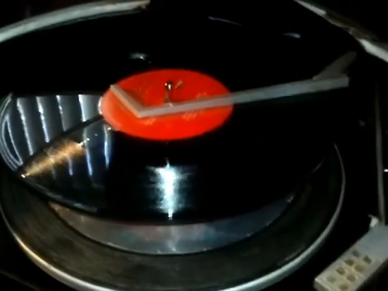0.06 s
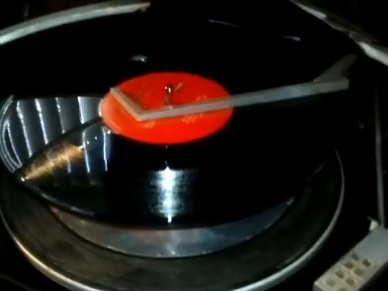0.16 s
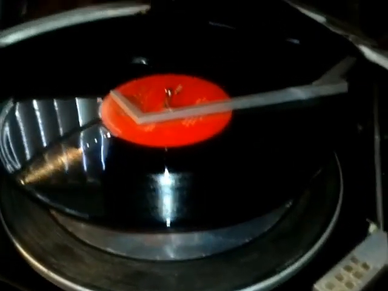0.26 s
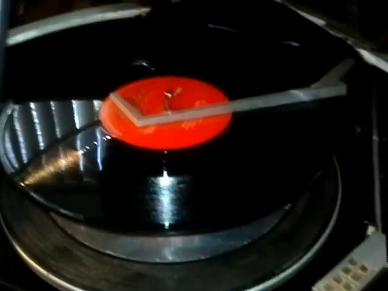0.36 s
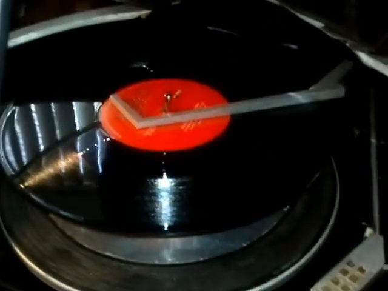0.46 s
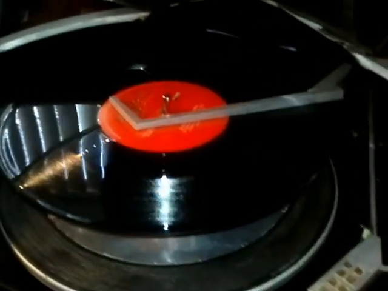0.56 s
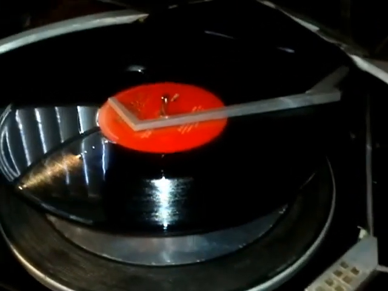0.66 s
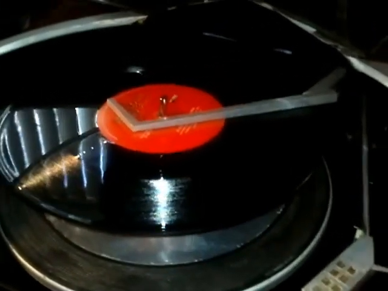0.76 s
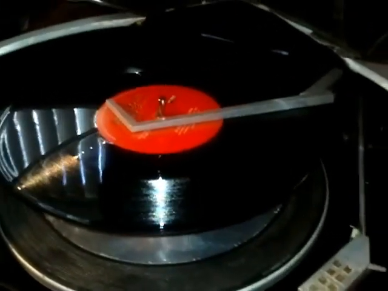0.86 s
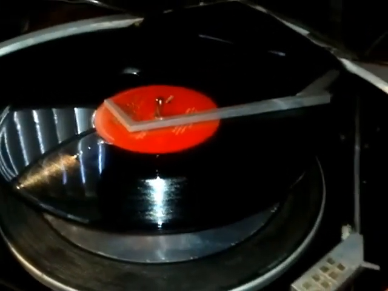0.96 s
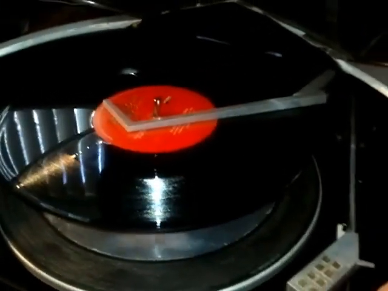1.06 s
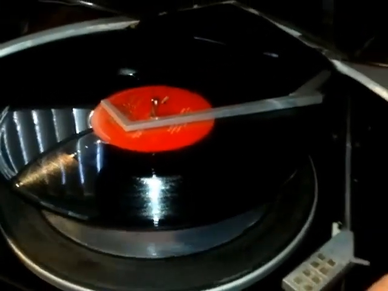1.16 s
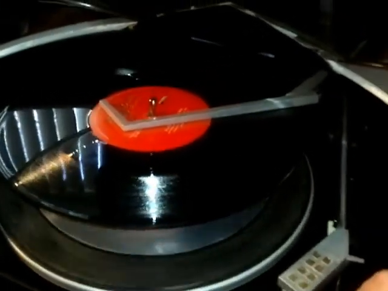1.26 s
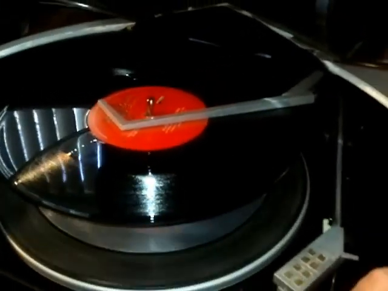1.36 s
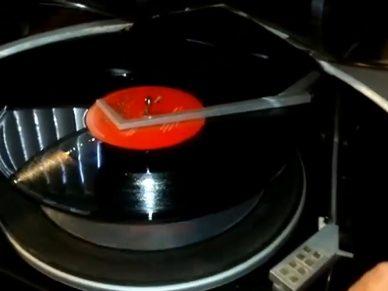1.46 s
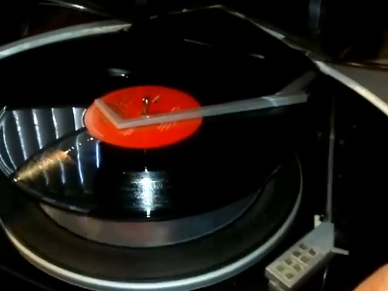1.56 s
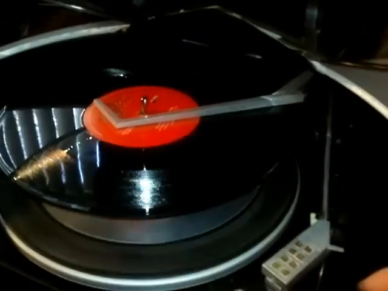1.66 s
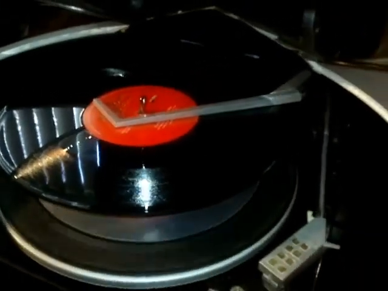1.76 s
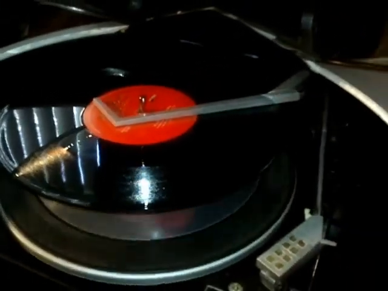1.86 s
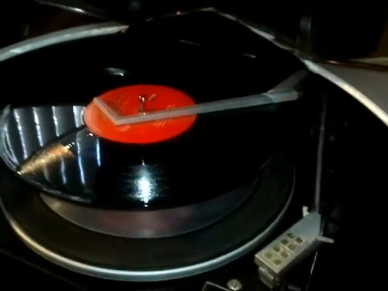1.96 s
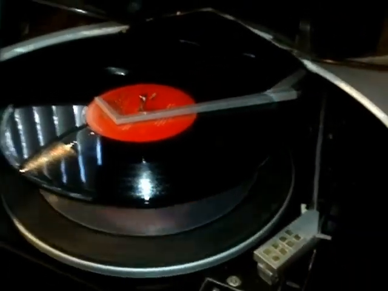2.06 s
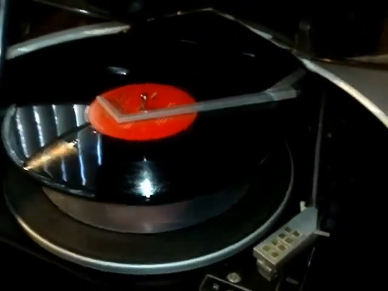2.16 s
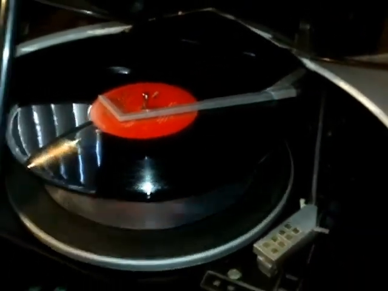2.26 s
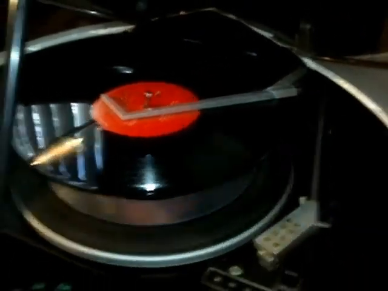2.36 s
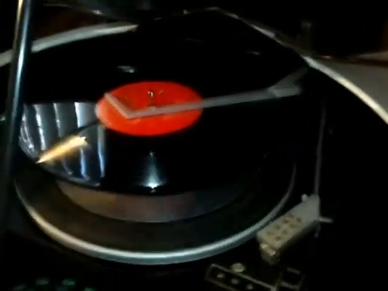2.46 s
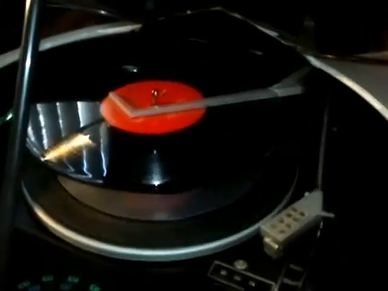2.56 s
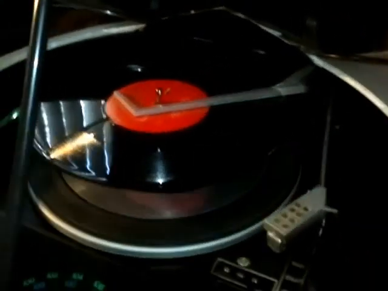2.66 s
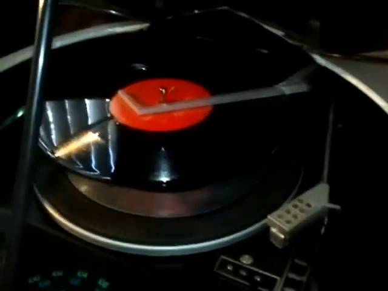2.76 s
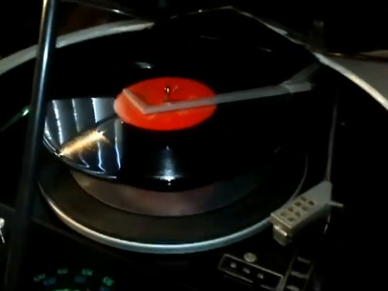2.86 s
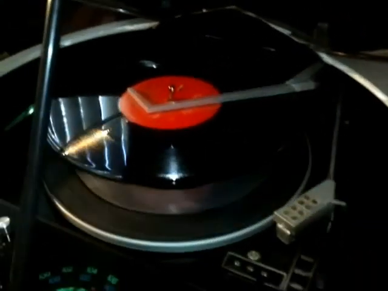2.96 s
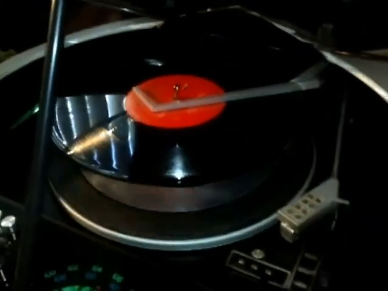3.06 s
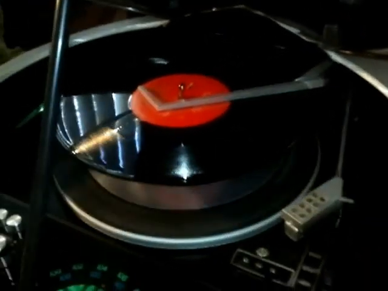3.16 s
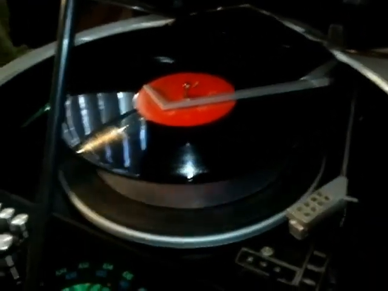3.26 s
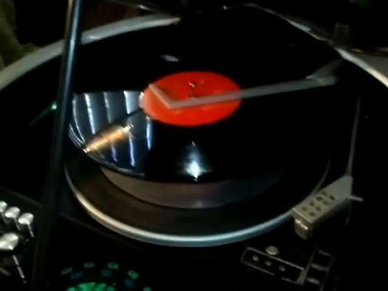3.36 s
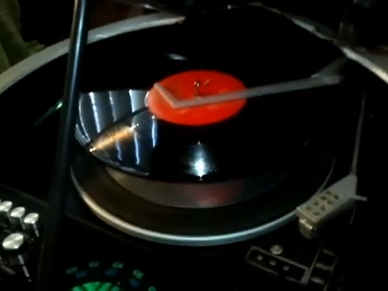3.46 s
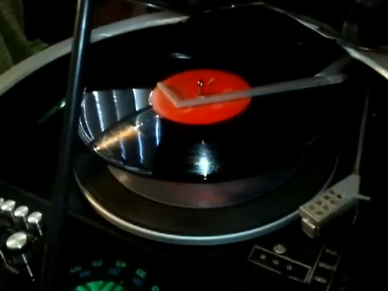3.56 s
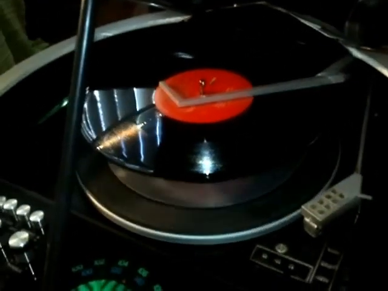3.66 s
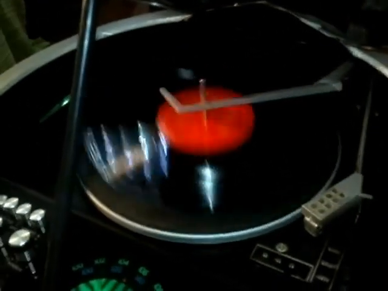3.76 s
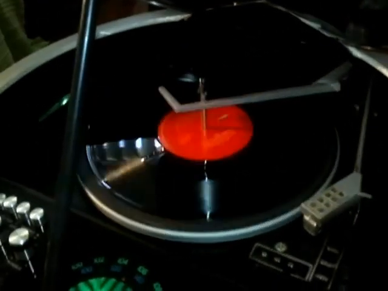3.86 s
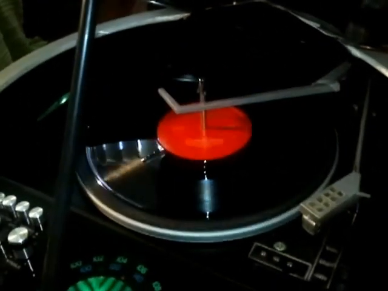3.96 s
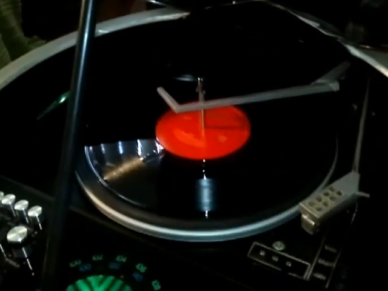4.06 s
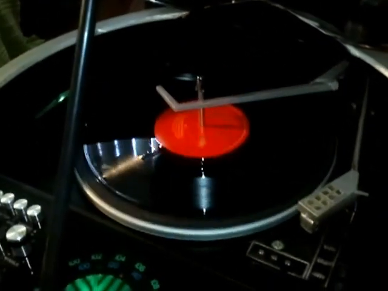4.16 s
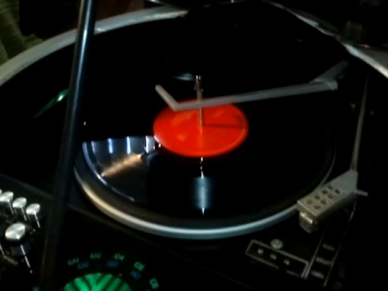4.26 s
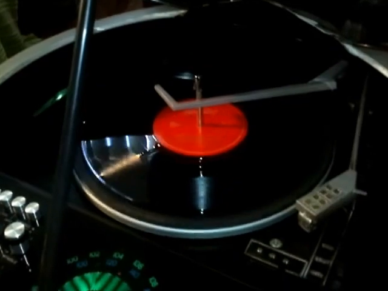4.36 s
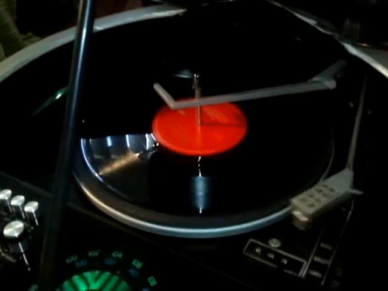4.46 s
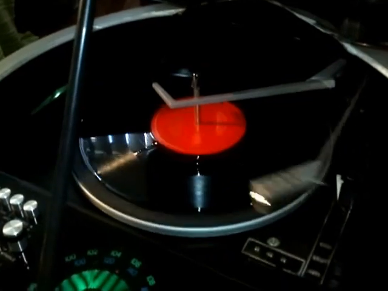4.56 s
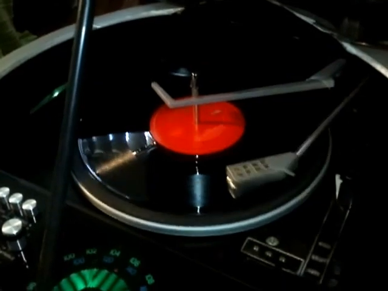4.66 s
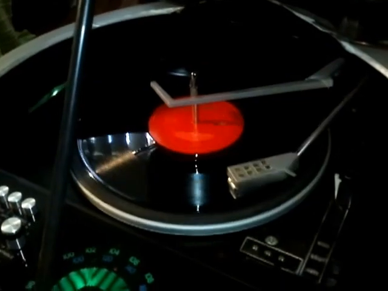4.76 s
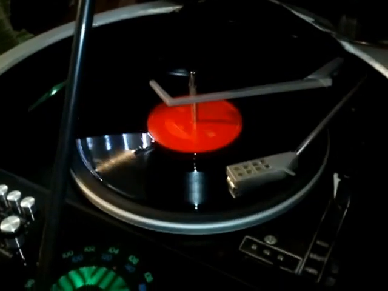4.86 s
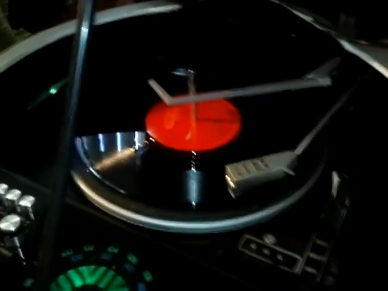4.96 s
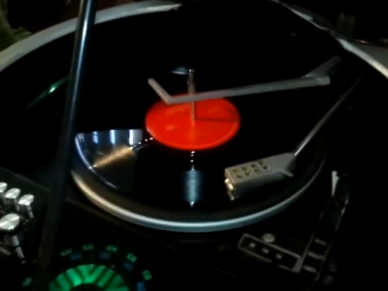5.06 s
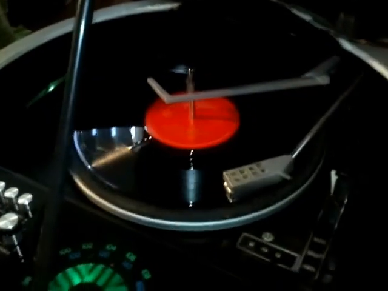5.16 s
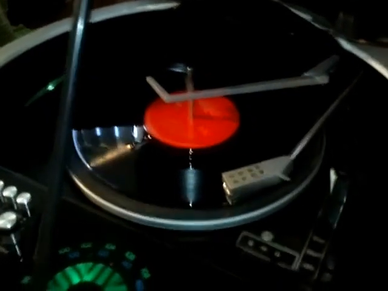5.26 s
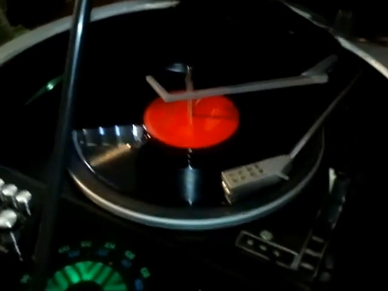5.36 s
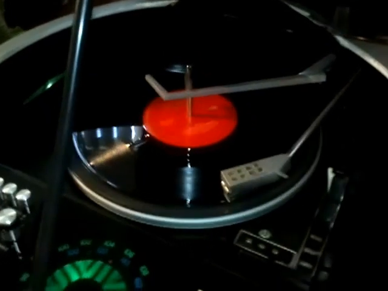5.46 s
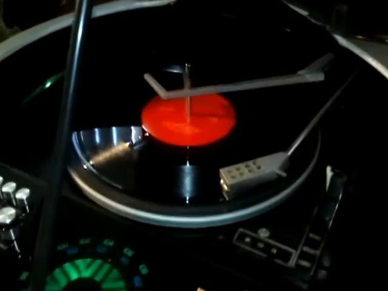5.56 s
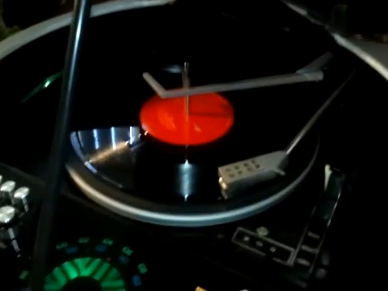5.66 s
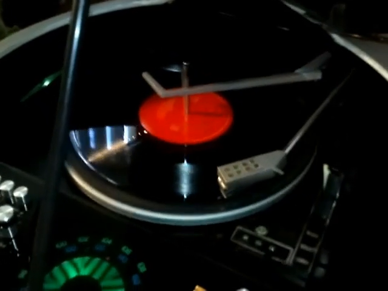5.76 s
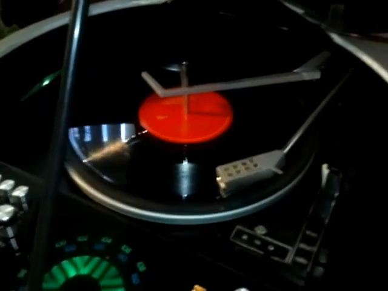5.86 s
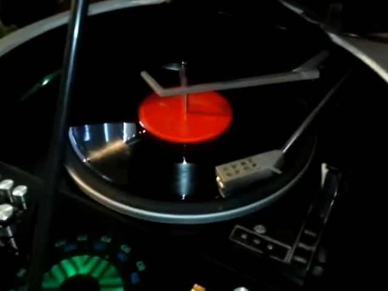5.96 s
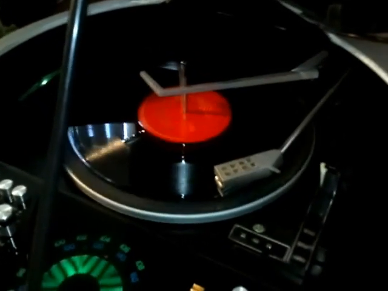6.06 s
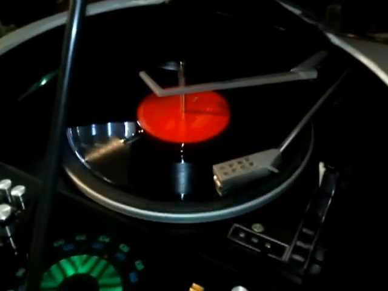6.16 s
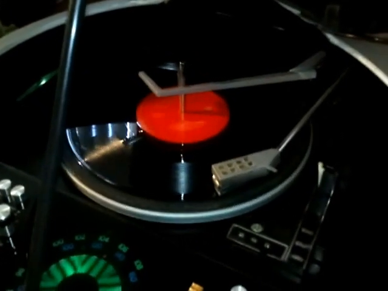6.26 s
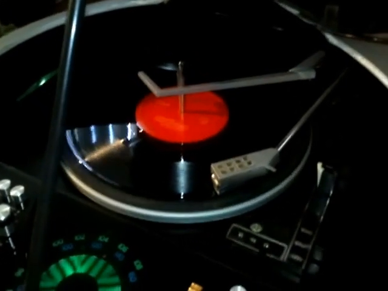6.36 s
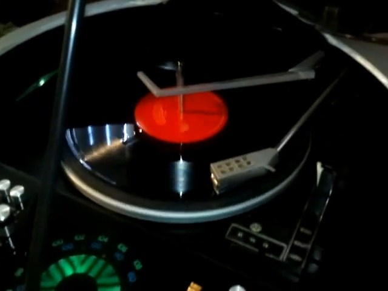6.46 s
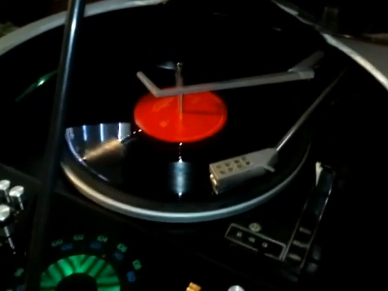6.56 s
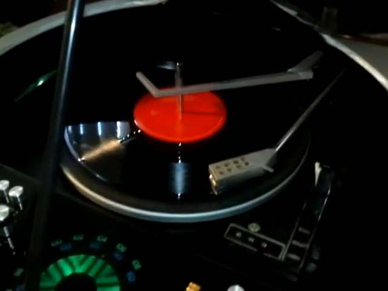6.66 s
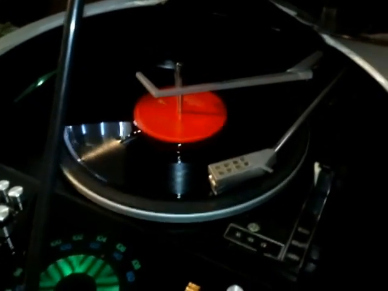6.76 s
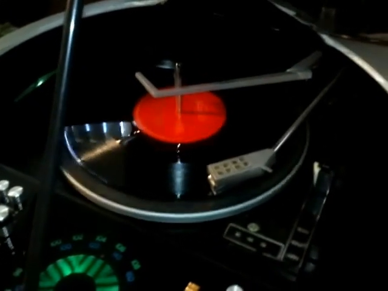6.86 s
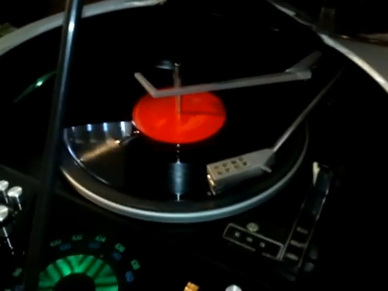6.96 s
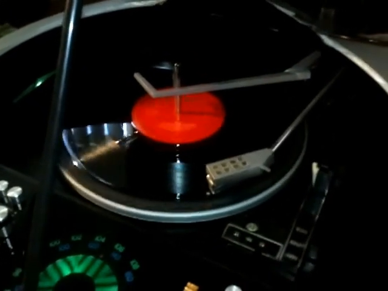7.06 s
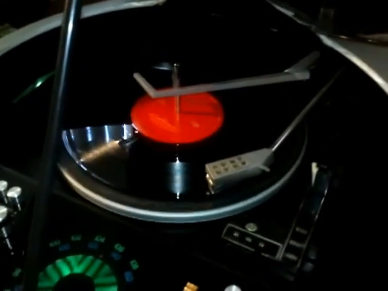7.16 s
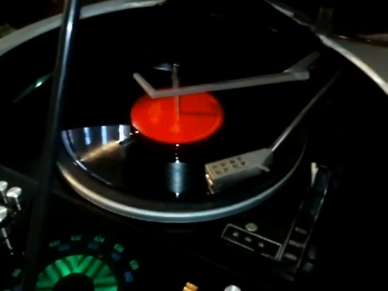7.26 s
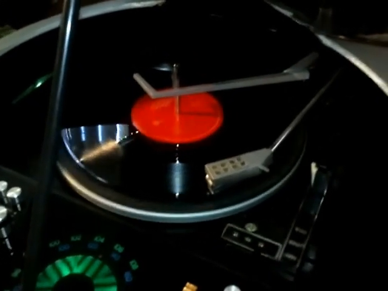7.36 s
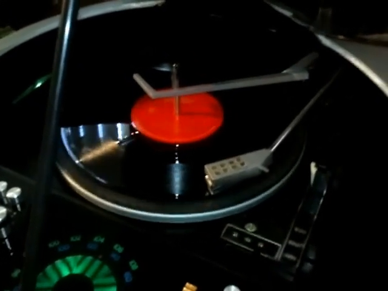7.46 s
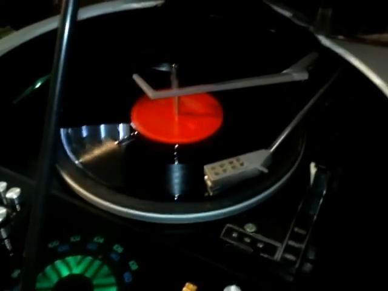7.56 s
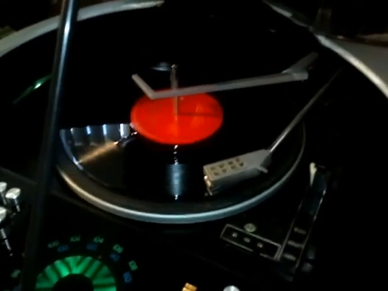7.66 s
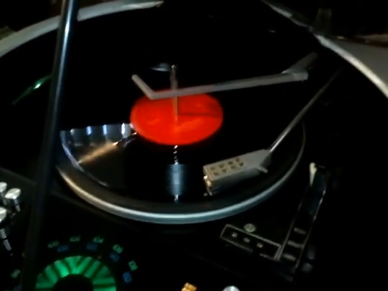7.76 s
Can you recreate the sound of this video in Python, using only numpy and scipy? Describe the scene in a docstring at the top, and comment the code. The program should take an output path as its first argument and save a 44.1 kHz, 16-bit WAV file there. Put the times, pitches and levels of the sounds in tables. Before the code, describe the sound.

A record changer, heard close in a small, short-echo room, over steady deep motor hum near 48 Hz and a bassy noise floor. Soft dull rubs come around 0.3-0.4 s, with a faint tick at 0.8. At 1.1 s the start lever snaps very loudly, followed by lesser clicks at 1.22-1.24 and a bright, hard clack against its stop at 1.53. From 2.05 s grainy midrange gear whirr rises, with cam knocks around 2.2 and brief drags at 2.9 and 3.2. At 3.8-3.9 the record drops in a tight flurry of slaps. Linkage clacks sharply at 4.27, lighter at 4.55-4.6, firmly again at 5.04. At 5.33-5.48 low loudspeaker thumps mark the landing; a scuffing skid follows at 5.64, another bump at 5.77, with thin sizzle. The whirr eases away, leaving hum and groove rumble, swelling gently after 6.9 until about 8.

```python
"""Record changer cycle

An automatic record changer runs through its cycle in a small room, over motor hum, gear noise and a steady floor.
Lever, stop, cam, record, linkage and pickup strike as filtered chatter plus damped modes; friction is shaped noise.
The stylus lands with low decaying tones from the loudspeaker, short skid tones and groove rumble."""
import sys
import numpy as np
from scipy import signal
from scipy.fft import rfft, irfft
from scipy.io import wavfile
from scipy.ndimage import uniform_filter1d

SR = 44100
rng = np.random.default_rng(int(sys.argv[2]) if len(sys.argv) > 2 else 0)


def wav_record(signal):
    """Record a signal, one row per channel, as 16-bit PCM in the file named by sys.argv[1]."""
    frames = np.transpose(np.atleast_2d(signal))
    bounded = np.clip(frames, -1, 1)
    # unit amplitude maps onto the largest positive 16-bit level
    quanta = np.round(bounded * 32767).astype(np.int16)
    wavfile.write(sys.argv[1], SR, quanta)


N = 343935
TIME = np.arange(N) / SR


def amp(db):
    """Decibels to gain."""
    return 10 ** (np.asarray(db) / 20)


def unit(x):
    """Scales to rms 1."""
    return x / np.sqrt(np.mean(x ** 2) + 1e-20)


def read(points, hz):
    """Reads a table on a log-frequency axis."""
    f, value = np.transpose(points)
    return np.interp(np.log(hz + 1), np.log(f + 1), value)


def add(mix, s, sound):
    """Mixes a sound in at time s."""
    part = mix[max(round(s * SR), 0):][:len(sound)]
    part += sound[:len(part)]


def noise(colour):
    """Steady noise of a given spectrum, rms 1."""
    gain = amp(read(colour, np.fft.rfftfreq(N, 1 / SR)))
    return unit(irfft(rfft(rng.standard_normal(N)) * gain, N))


def drift(knots_per_s):
    """Random wandering between 2000 knots, rms 1; holds its value after the last knot."""
    knots = rng.standard_normal(2000)
    return unit(np.interp(TIME * knots_per_s, np.arange(len(knots)), knots))


def since(start_s, settle_s):
    """Rises from 0 at start_s and settles exponentially at 1."""
    return 1 - np.exp(-np.maximum(TIME - start_s, 0) / settle_s)


def bumps(rows):
    """Sum of bell-shaped swells, from rows of middle_s, length_s and height."""
    return [(height, np.exp(-(2 * (TIME - s) / length) ** 2)) for s, length, height in rows]


def causal(gain_db):
    """Minimum-phase impulse response: the earliest energy this spectrum allows, normalised to 1."""
    log_gain = np.log(amp(np.r_[gain_db, gain_db[-2:0:-1]]))
    spectrum = np.exp(np.conj(signal.hilbert(log_gain)))
    click = np.fft.ifft(spectrum).real[:len(gain_db)]
    return click / np.linalg.norm(click)


def ring(modes, t):
    """Damped sines, each with a random starting phase."""
    out = 0
    for hz, db, t60 in modes:
        phase_turns = rng.random()
        out = out + amp(db - 60 * t / t60) * np.sin(2 * np.pi * (hz * t + phase_turns))
    return out


# room decay: band_hz, t60_s
ROOM_DECAY = [(150, 0.3), (600, 0.3), (2000, 0.2), (6000, 0.23), (15000, 0.24)]


def room(x, onset_s=0.0055):
    """A small room: dense reflections build up, then each band dies at its own speed."""
    hz, t, z = signal.stft(rng.standard_normal(SR // 2), SR, nperseg=256)
    decay = amp(-60 * t / read(ROOM_DECAY, hz)[:, None])
    tail = signal.istft(z * decay, SR, nperseg=256)[1]
    tail *= 1 - np.exp(-(np.arange(len(tail)) / SR / onset_s) ** 2)
    return signal.fftconvolve(x, tail / np.linalg.norm(tail))[:N]


def placed(x, db, room_db):
    """A source at its level; room_db sets its reflections relative to the direct sound."""
    return amp(db) * (x + amp(room_db) * room(x))


# steady background spectrum: band_hz, relative_density_db
FLOOR_COLOUR = [(20, -19), (40, -7.5), (55, 2.5), (72, -12.5), (110, -13), (200, -18), (320, -20.5),
                (480, -25), (700, -30.5), (1400, -42), (2050, -31.5), (3100, -51), (7000, -49),
                (11000, -50.5), (15500, -70.5)]
FLOOR_DB = -43


def floor():
    """Steady background noise, strongest in the bass."""
    return amp(FLOOR_DB) * noise(FLOOR_COLOUR)


def wavering(x, patchy_db=1.84):
    """Sound below 3 kHz wavers in patches of about 500 Hz by 0.14 s."""
    hz, _, z = signal.stft(x, SR, nperseg=1024, noverlap=768)
    patches = uniform_filter1d(rng.standard_normal(z.shape), size=12, axis=0)
    patches = unit(uniform_filter1d(patches, size=24, axis=1))
    z = z * amp(patchy_db * patches * (hz < 3000)[:, None])
    return signal.istft(z, SR, nperseg=1024, noverlap=768)[1][:N]


# brief bass dips: middle_s, length_s, depth_db
BASS_DIPS = [(1.154, 0.12, -7), (4.165, 0.073, -12), (5.244, 0.1, -15), (6.7, 0.19, -15)]


def bass_dips():
    """Gain of the low hum and groove rumble, whose level dips briefly."""
    return amp(sum(depth_db * bump for depth_db, bump in bumps(BASS_DIPS)))


# bearing rumble spectrum, peaking by the shaft speed: band_hz, relative_density_db
RUMBLE_COLOUR = [(30, -26), (45, -9), (49, 7), (57, 8), (63, -7), (75, -18.5), (120, -48), (600, -100)]
# faint motor lines: pitch_hz, rms_db
MOTOR_LINES = [(97.5, -60.5), (243.5, -56), (296, -65), (342, -61.5)]
SHAFT_HZ, SHAFT_RMS_DB, RUMBLE_RMS_DB = 48.4, -37, -44  # before the bass dips


def motor(waver=.004):
    """The unbalanced rotor shakes the deck and beats with bearing rumble; weak higher lines waver above it."""
    shaft = np.sqrt(2) * amp(SHAFT_RMS_DB) * np.sin(2 * np.pi * SHAFT_HZ * TIME)
    rumble = amp(RUMBLE_RMS_DB) * noise(RUMBLE_COLOUR)
    lines = np.zeros(N)
    for hz, db in MOTOR_LINES:
        elapsed_s = np.cumsum(1 + waver * drift(13)) / SR
        lines += np.sqrt(2) * amp(db) * np.sin(2 * np.pi * hz * elapsed_s)
    return bass_dips() * (shaft + rumble) + lines


CAM_IN_S, CAM_OUT_S, ENGAGE_S, RUN_DOWN_S = 2.05, 5.37, 0.14, 0.51
IDLE_DB, CYCLE_DB, PLAY_DB = -64, -50, -58.5


def gear_load(wander_db=0.5):
    """Gain of the gear noise: idle, loaded while the cam turns, then easing off as the record plays."""
    engaged, released = since(CAM_IN_S, ENGAGE_S), since(CAM_OUT_S, RUN_DOWN_S)
    load_db = IDLE_DB + (CYCLE_DB - IDLE_DB) * engaged + (PLAY_DB - CYCLE_DB) * released
    return amp(load_db + wander_db * drift(5.7))


# gear noise spectrum: band_hz, relative_density_db
WHIRR_COLOUR = [(400, -26), (800, -2), (1150, -3.5), (1700, 0.5), (2350, -3.5), (2700, -11.5),
                (3100, -30.5), (4200, -30), (5100, -27.5), (6200, -33.5), (12000, -50)]


def gears(uneven_db=2.0, grain_db=-7, grains_per_s=70):
    """Idler and cam gear rub unevenly, with tiny random ticks of their teeth."""
    sizes = amp(1.2 * np.minimum(rng.exponential(1, N), 3))
    teeth = (rng.random(N) < grains_per_s / SR) * sizes
    tick = causal(read(WHIRR_COLOUR, np.fft.rfftfreq(1024, 1 / SR)))
    ticks = signal.oaconvolve(teeth, tick)[:N]
    rubbing = noise(WHIRR_COLOUR) * amp(uneven_db * drift(45))
    return gear_load() * (rubbing + amp(grain_db) * unit(ticks))


def friction(rows, colour, uneven_db):
    """Friction noise in short, uneven, bell-shaped swells."""
    stroke = sum(amp(db) * bump for db, bump in bumps(rows))
    return stroke * noise(colour) * amp(uneven_db * drift(90))


# soft rubs: middle_s, length_s, level_db
RUBS = [(0.337, 0.081, -44.5), (0.423, 0.23, -48.5), (0.83, 0.17, -51), (1.953, 0.17, -50.5)]
# their spectrum: band_hz, relative_density_db
RUB_COLOUR = [(200, 8.5), (500, 4.5), (800, 5.5), (1400, -1.5), (3000, -17.5), (7500, -24), (14000, -37)]


def handling_rubs():
    """Soft dull rubs while the deck is handled."""
    return friction(RUBS, RUB_COLOUR, uneven_db=2.5)


# harder cam drag: middle_s, length_s, level_db
DRAGS = [(2.87, 0.066, -44), (2.935, 0.061, -42.5), (3.21, 0.071, -45)]


def cam_drags():
    """The cam gear drags harder for a moment, swelling noise of the gear colour."""
    return friction(DRAGS, WHIRR_COLOUR, uneven_db=3.0)


# cam follower and arm pivot sliding: middle_s, length_s, level_db
PIVOT = [(2.87, 0.1, -68), (3.25, 0.084, -65.5), (3.47, 0.28, -65), (4.765, 0.047, -58.5), (5.25, 0.1, -65),
         (5.88, 0.048, -53)]
# their spectrum: band_hz, relative_density_db
PIVOT_COLOUR = [(2500, -24), (4000, -12), (5100, -4), (6100, -23), (8000, -19), (14000, -38)]


def pivot_hiss():
    """Thin hiss of the cam follower and arm pivot sliding."""
    return friction(PIVOT, PIVOT_COLOUR, uneven_db=1.5)


# stylus finding the groove: middle_s, length_s, level_db
SIZZLE = [(5.58, 0.12, -66), (5.8, 0.1, -56.5), (6.05, 0.35, -68.5)]
# its spectrum: band_hz, relative_density_db
SIZZLE_COLOUR = [(2500, -29.5), (5500, -5), (7500, -4), (9500, -23), (11500, 1), (13000, -18),
                 (15000, -27.5)]


def stylus_sizzle():
    """High sizzle as the stylus finds the groove."""
    return friction(SIZZLE, SIZZLE_COLOUR, uneven_db=1.4)


# groove rumble spectrum: band_hz, relative_density_db
GROOVE_COLOUR = [(45, 2), (75, -2.5), (103, 11), (135, -8), (195, 0), (260, -5.5), (400, -28), (900, -61),
                 (4000, -90)]
LAND_S, SETTLE_S, TRACK_S = 5.36, .3, 6.9  # landing time, settling time constant, first turns begin
LANDING_DB, LEAD_IN_DB, TRACKING_DB = -35, -45, -41  # before onset, unevenness and dips


def groove(rise_s=0.045, swell_s=0.09, uneven_db=1.5):
    """The stylus reads groove rumble: loud on landing, low in the lead-in, swelling in the first turns."""
    settled, tracking = since(LAND_S, SETTLE_S), since(TRACK_S, swell_s)
    db = LANDING_DB + (LEAD_IN_DB - LANDING_DB) * settled + (TRACKING_DB - LEAD_IN_DB) * tracking
    level = since(LAND_S, rise_s) * amp(db + uneven_db * drift(6))
    return level * bass_dips() * noise(GROOVE_COLOUR)


# stylus skids: start_s, length_s, relative_level_db
SKIDS = [(5.643, .034, -16), (5.728, .038, -27)]
SKID_HZ = 246


def skids(rise_s=0.0019, release_s=0.0093, waver=.04, uneven_db=2.0):
    """Stick and slip shake the arm near one pitch while the stylus skids; then it rings out."""
    t = np.arange(SR // 4) / SR
    push = np.zeros(N)
    for s, length, db in SKIDS:
        release = np.exp(-np.maximum(t - length, 0) / release_s)
        add(push, s, amp(db) * (1 - np.exp(-t / rise_s)) * release)
    elapsed_s = np.cumsum(1 + waver * drift(80)) / SR
    return push * amp(uneven_db * drift(120)) * np.sin(2 * np.pi * SKID_HZ * elapsed_s)


# stylus jolts: start_s, relative_level_db, pitch_hz, t60_s
THUMPS = [(5.329, -10, 176, 0.04), (5.35, -14.5, 109.4, 0.13), (5.402, -14.5, 271, 0.077),
          (5.448, -13, 190.4, 0.14), (5.477, -18.5, 149, 0.11), (5.767, -12.5, 106, 0.049),
          (5.811, -23.5, 102, 0.094)]
# loudspeaker cabinet modes: pitch_hz, relative_level_db, t60_s
CABINET_MODES = [(108, -7, 0.22), (154.6, -0.5, 0.26), (217, 5.5, 0.12)]


def thumps(cabinet_db=-15, rise_s=0.00053, scuff_db=-22, scuff_t60=0.14):
    """Each stylus jolt pushes the loudspeaker cone and rings its cabinet, with a brief dull scuff."""
    out, t = np.zeros(N), np.arange(SR // 2) / SR
    scuff = noise([(100, -10), (330, 8.5), (600, -8.5), (1000, -9.0), (2000, -19), (3500, -29), (12000, -45)])
    for s, db, hz, t60 in THUMPS:
        cone = -np.sin(2 * np.pi * hz * t) * amp(-60 * t / t60)
        push = amp(db) * (1 - np.exp(-t / rise_s))
        boom = cone + amp(cabinet_db) * ring(CABINET_MODES, t)
        scrape = amp(scuff_db - 60 * t / scuff_t60) * scuff[int(s * SR):][:len(t)]
        add(out, s, push * (boom + scrape))
    return out


# sliding before a snap: end_s, length_s, level_db
SLIDES = [(1.096, 0.034, -36), (1.104, 0.014, -17), (1.261, 0.084, -31), (1.535, 0.033, -39.5),
          (3.812, 0.031, -40), (5.036, 0.0082, -39), (5.399, 0.028, -38)]
# its spectrum: band_hz, relative_density_db
SLIDE_COLOUR = [(200, -18), (900, -2), (2000, 2.5), (3300, -8.5), (8000, -21.5), (15000, -33.5)]


def slides():
    """Friction that swells as a spring is loaded, and stops when it lets go."""
    load = np.zeros(N)
    for end_s, length, db in SLIDES:
        swell = np.linspace(.35, 1, max(int(length * SR), 2))
        add(load, end_s - length, amp(db) * swell)
    return load * noise(SLIDE_COLOUR) * amp(2.1 * drift(390))


# soft pushes on the arm tube: start_s, relative_level_db
NUDGES = [(5.012, -33), (5.173, -30.5), (5.211, -28), (5.257, -28.5), (5.37, -33), (5.38, -25),
          (5.403, -14.5), (5.521, -24.5)]
# arm tube modes: pitch_hz, relative_level_db, t60_s
TUBE_MODES = [(1704, 0, 0.039), (1930, -9, 0.022), (2224, -7, 0.023)]
SWING_START_S, SWING_END_S, RATTLES_PER_S, RATTLE_RELATIVE_DB = 4.3, 5.3, 9, -33


def nudges(push_s=0.0037):
    """Slow pushes ring only the arm tube's lowest modes; fainter ones come by chance as the arm swings."""
    t = np.arange(SR // 8) / SR
    swinging = (TIME > SWING_START_S) & (TIME < SWING_END_S)
    pushes = amp(RATTLE_RELATIVE_DB) * swinging * (rng.random(N) < RATTLES_PER_S / SR)
    for s, db in NUDGES:
        add(pushes, s, amp([db]))
    tube = (1 - np.exp(-(t / push_s) ** 2)) * ring(TUBE_MODES, t)
    return amp(3.0) * signal.oaconvolve(pushes, tube)[:N]


def through_chassis(force, spread_s):
    """Bending waves carry the highs ahead of the lows; dense modes even out the blow's spectrum."""
    hz, z = np.fft.rfftfreq(len(force), 1 / SR), rfft(force)
    z = z / np.sqrt(uniform_filter1d(abs(z) ** 2, size=160))
    turns = 2 * spread_s * np.sqrt(1e3 * hz)  # delay is spread_s at 1 kHz, falling as 1/sqrt(hz)
    fade = np.clip(np.linspace(2, -1, len(force)), 0, 1)
    return fade * irfft(z * np.exp(-2j * np.pi * turns), len(force))


def strikes(rows, colour, modes, crack, modes_db, rise_s, spread_s):
    """Each contact: a crack, a dense dying chatter of the chassis, and the part's own modes."""
    out, t, hz = np.zeros(N), np.arange(SR // 4) / SR, np.fft.rfftfreq(2048, 1 / SR)
    swell = 1 - np.exp(-t / max(rise_s, 1e-5))
    for s, db, tilt_db_per_octave, t60 in rows:
        chatter = rng.choice([-1., 1.], len(t)) * swell * amp(-60 * t / max(t60, .004))
        chatter /= np.linalg.norm(chatter)
        chatter[np.argmax(swell > .5)] += crack
        octaves = np.log2(np.maximum(hz, 500) / 2000)
        body = causal(read(colour, hz) + tilt_db_per_octave * octaves)
        blow = signal.fftconvolve(through_chassis(chatter, spread_s), body)[:len(t)]
        blow /= np.sqrt(uniform_filter1d(blow ** 2, size=176).max())  # strongest 4 ms at rms 1
        add(out, s, amp(db) * (blow + amp(modes_db) * swell * ring(modes, t)))
    return out


# lever contacts: start_s, relative_level_db, brightness_db_per_octave
LEVER = [(0.819, -36.5, -2.5), (1.0603, -20, -2.5), (1.095, -10, -6), (1.097, 2, 2.5), (1.22, -21.5, -0.5),
         (1.231, -12.5, 4), (1.244, -15.5, -5.5)]
# their spectrum: band_hz, relative_density_db
LEVER_COLOUR = [(90, -47.5), (160, -26), (400, -18), (560, -13), (800, -12.5), (1000, -10), (1300, -5.5),
                (1750, -1.5), (2200, -5), (3600, -8), (4600, -15), (8900, -15.5), (16000, -31)]
# lever modes: pitch_hz, relative_level_db, t60_s
LEVER_MODES = [(975, -9, 0.093), (1450, -10, 0.064), (1495, -6.5, .05), (1650, 4, .045), (2320, 0, .04)]
LEVER_T60_S = 0.044


def lever():
    """The start lever is pushed over its detent and snaps."""
    hits = strikes([(*row, LEVER_T60_S) for row in LEVER], LEVER_COLOUR, LEVER_MODES,
                   crack=0.34, modes_db=-15.5, rise_s=0.0014, spread_s=0.000993)
    return placed(hits, db=-8.0, room_db=-13.0)


# lever stop: start_s, relative_level_db, brightness_db_per_octave, t60_s
STOP = [(1.532, -2, 1, 0.043)]
# its spectrum: band_hz, relative_density_db
STOP_COLOUR = [(90, -37), (160, -15), (330, -15.5), (820, -6.5), (1600, -2), (2700, -4.5), (4000, -0.5),
               (5000, -8), (8000, -7.5), (11300, -16), (15000, -35), (16000, -60.5)]


def stop():
    """The lever springs back against its stop and rings its own modes."""
    hits = strikes(STOP, STOP_COLOUR, LEVER_MODES,
                   crack=0.3, modes_db=-29, rise_s=0.00089, spread_s=0.00138)
    return placed(hits, db=-9, room_db=-9.0)


# cam knocks: start_s, relative_level_db, brightness_db_per_octave, t60_s
CAM = [(2.133, -22, -2.5, 0.059), (2.179, -8, 0, 0.041), (2.195, -14, 1, 0.066), (2.206, -13, 4.5, 0.028),
       (2.849, -23, -6, 0.014)]
# their spectrum: band_hz, relative_density_db
CAM_COLOUR = [(120, -17), (350, -6), (600, -15), (950, -6), (1350, 2), (1800, -0.5), (2250, 5),
              (2900, -18.5), (4300, -22), (8000, -34), (11000, -43), (15000, -61)]
# linkage modes, shared with the arm linkage: pitch_hz, relative_level_db, t60_s
LINKAGE_MODES = [(1466, -5.5, 0.089), (1740, -10, 0.16), (1850, 17, 0.013), (2170, -32, 0.028)]


def cam():
    """The cam gear catches and knocks, ringing the linkage."""
    hits = strikes(CAM, CAM_COLOUR, LINKAGE_MODES,
                   crack=0.79, modes_db=-10, rise_s=0.0016, spread_s=0.001416)
    return placed(hits, db=-11.5, room_db=-9)


# record contacts: start_s, relative_level_db, brightness_db_per_octave, t60_s
DROP = [(3.78, -19, -5.5, 0.16), (3.808, -15.5, 3.5, 0.054), (3.825, 0, -1, 0.042), (3.842, -7, -3.5, 0.15),
        (3.87, 3.5, -0.5, 0.074), (3.88, 1.5, -5.5, 0.073), (3.886, 1.5, 1, 0.06), (3.906, -17, 4, 0.057)]
# their spectrum: band_hz, relative_density_db
DROP_COLOUR = [(60, -38), (125, -12.5), (190, -11), (240, -5.5), (400, -8), (680, -9), (850, 3.5),
               (1100, -8), (1650, -0.5), (2250, -4.5), (2850, -15.5), (4100, -10.5), (8000, -20),
               (12000, -31.5), (16000, -44)]
# record and platter modes: pitch_hz, relative_level_db, t60_s
DROP_MODES = [(260, -4, 0.083), (325, 0, 0.13), (578, -3, .07), (735, -7, 0.046), (950, -5, .06),
              (1360, 5, 0.072), (1655, 7.5, 0.1)]


def drop():
    """The record slips off its ledge, drops down the spindle and slaps onto the platter."""
    hits = strikes(DROP, DROP_COLOUR, DROP_MODES,
                   crack=0.45, modes_db=-16.5, rise_s=.0008, spread_s=0.00115)
    return placed(hits, db=-13.0, room_db=-11.5)


# linkage clacks: start_s, relative_level_db, brightness_db_per_octave, t60_s
LINKAGE = [(4.2686, 2, 1, 0.021), (4.2744, -9.5, 7, 0.039), (4.554, -10.5, -1, 0.03),
           (4.5844, -12.5, -1, 0.019), (4.5939, -17, -2.5, 0.047), (4.6394, -35, 9, 0.03),
           (5.0365, -4, 1.5, 0.034), (5.0494, -23, -1.5, 0.05), (5.466, -26, 10.5, 0.049)]
# their spectrum: band_hz, relative_density_db
LINKAGE_COLOUR = [(150, -20), (400, -9), (650, -26.5), (1050, -16.5), (1600, 4.5), (2200, 2.5),
                  (2950, -24.5), (3750, -9.5), (4900, -18.5), (6000, -34), (8000, -33), (11000, -51),
                  (15000, -70)]


def linkage():
    """The arm linkage clacks as the arm swings over."""
    hits = strikes(LINKAGE, LINKAGE_COLOUR, LINKAGE_MODES,
                   crack=0.78, modes_db=-9.5, rise_s=0.0012, spread_s=0.00153)
    return placed(hits, db=-10, room_db=-7.5)


# pickup contacts: start_s, relative_level_db, brightness_db_per_octave, t60_s
PICKUP = [(5.401, -12, 2, 0.036), (5.413, -21, 3, 0.1), (5.446, -27.5, 1.5, 0.11),
          (5.642, -10.5, -1, 0.079), (5.66, -13, 0.5, 0.067), (5.769, -25.5, -11, 0.077),
          (5.867, -25, -8.5, 0.21), (5.881, -35, -2, 0.063)]
# their spectrum: band_hz, relative_density_db
PICKUP_COLOUR = [(290, -5), (500, -5), (761, -7), (1690, 1), (2290, -7.5), (2850, -22.5), (3650, -11.5),
                 (3920, -18), (4280, -12), (8210, -17.5), (8830, -22.5), (11100, -19), (16000, -40)]
# pickup modes: pitch_hz, relative_level_db, t60_s
PICKUP_MODES = [(1250, -14, 0.045), (1780, 2, .06)]


def pickup():
    """The pickup head meets the disc."""
    hits = strikes(PICKUP, PICKUP_COLOUR, PICKUP_MODES,
                   crack=0.28, modes_db=-9, rise_s=0.00111, spread_s=0.001987)
    return placed(hits, db=-11, room_db=-11.0)


def scene():
    """The deck and its loudspeaker, close by in the room."""
    running = motor() + wavering(gears() + floor())
    rubbing = handling_rubs() + cam_drags() + pivot_hiss() + stylus_sizzle()
    speaker = placed(thumps() + skids(), db=-2, room_db=-8.5) + groove()
    controls = lever() + stop()
    changer = cam() + drop()
    arm = linkage() + pickup() + nudges()
    return (running + rubbing + speaker + controls + changer + arm + slides())[None]


EDGE_HZ = 16100


def record(dry):
    """The loudest peaks round off at full scale; then a low-pass sets the band limit."""
    limited = dry / (1 + dry ** 6) ** (1 / 6)
    lowpass = signal.firwin(511, EDGE_HZ, window=("kaiser", 9), fs=SR)
    return signal.oaconvolve(limited, lowpass[None], "same")


dry = scene()
out = record(dry)
wav_record(out)
```